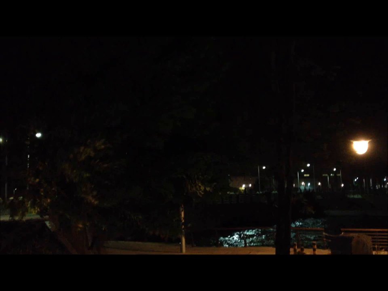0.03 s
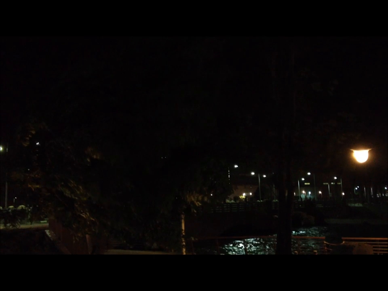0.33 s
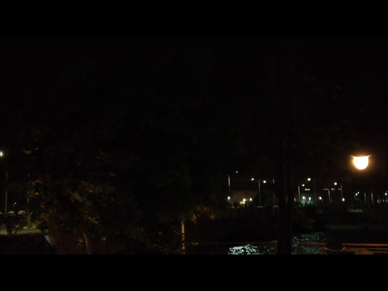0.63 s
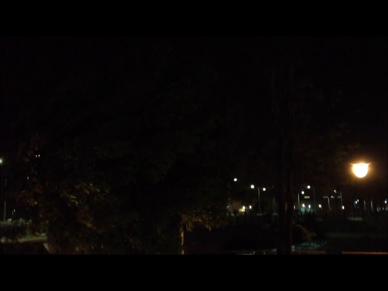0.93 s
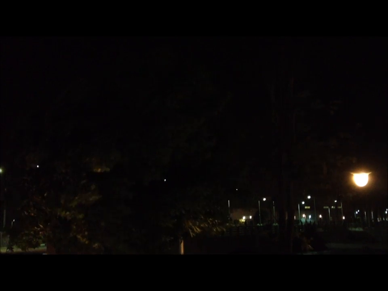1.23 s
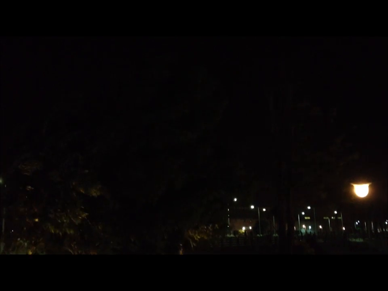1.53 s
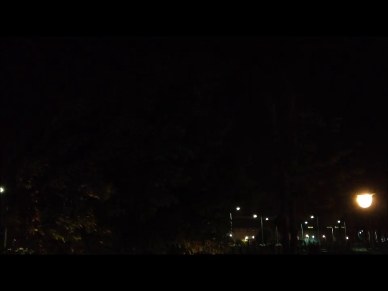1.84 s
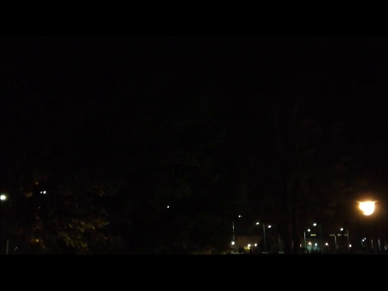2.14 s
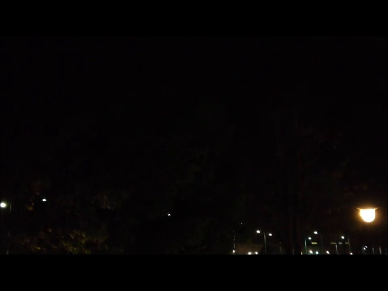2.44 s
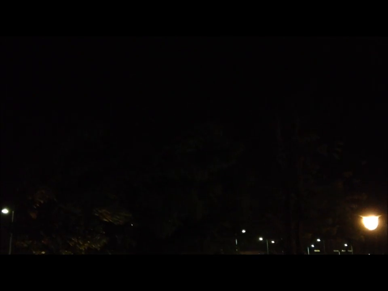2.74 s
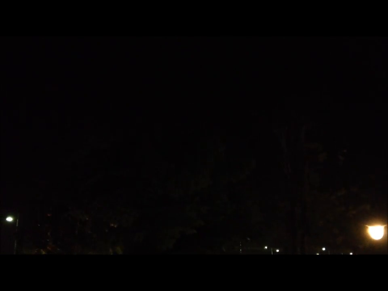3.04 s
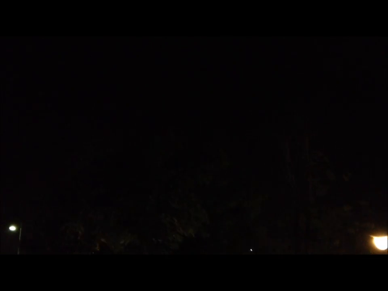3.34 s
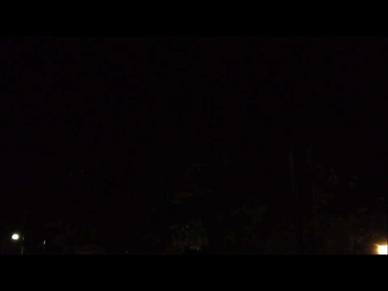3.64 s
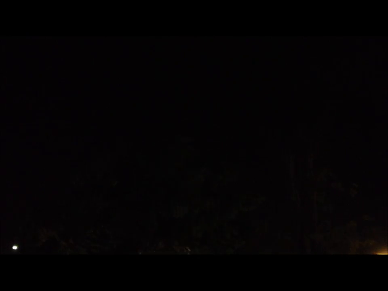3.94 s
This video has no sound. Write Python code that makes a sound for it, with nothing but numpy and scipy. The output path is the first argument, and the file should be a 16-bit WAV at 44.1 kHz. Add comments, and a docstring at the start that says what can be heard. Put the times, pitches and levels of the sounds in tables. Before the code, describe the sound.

Wind rushes through park trees at night, leaves hissing over a low rumble, with a faint twig tick now and then. It eases slightly, then a stronger gust builds as a few soft bumps touch the microphone.

```python
"""Wind in park trees at night, heard through one microphone.
First a gust rushes through the treetops over a low rumble; countless leaves hiss and patter.
Now and then a twig ticks or a soft puff of air hits the microphone. The gust dies away,
and in the lull a deeper rumble swells. From about 2.6 s a hand bumps the microphone a few times,
while a second, stronger gust builds. It peaks near 3.5 s and begins to ease."""
import sys
import numpy as np
from scipy import signal
from scipy.fft import rfft, irfft
from scipy.io import wavfile
from scipy.ndimage import uniform_filter1d

SR = 44100
rng = np.random.default_rng(int(sys.argv[2]) if len(sys.argv) > 2 else 0)


def dump(signal):
    """Clip the signal to [-1, 1] and save it as 16-bit WAV at the path in sys.argv[1]."""
    limited = np.clip(np.atleast_2d(signal).T, -1, 1)
    pcm = np.round(limited * 32767).astype(np.int16)
    wavfile.write(sys.argv[1], SR, pcm)


N = 176400
T = np.arange(N) / SR


# How loud the rushing air is over time: time_s, level_db
RUSH_LOUDNESS = [(0, -43), (.45, -44), (1.1, -44.5), (1.4, -45.3), (1.9, -46), (2.3, -45), (2.72, -45),
                 (2.9, -43), (3.45, -41), (4, -44)]
# Its tone, from low to high: pitch_hz, level_db
RUSH_TONE = [(150, -25), (330, -4), (410, 0.5), (500, -2.5), (620, -0.3), (730, 1), (900, 0), (1100, -3),
             (1500, -1.5), (2000, -2), (2500, -6.5), (3200, -11), (5000, -15.5), (10000, -51)]
def rushing_air():
    """Air streaming through the treetops makes a smooth, distant roar."""
    return from_db(curve(RUSH_LOUDNESS)) * with_tone(rng.standard_normal(N), RUSH_TONE)


# How strong the wind is, for the leaves and the wind's rumble: time_s, strength_db
WIND_STRENGTH = [(0, -1.5), (.25, -0.2), (.8, -0.5), (1.15, -1.2), (1.4, -3.5), (1.62, -2.2), (1.95, -3.5),
                 (2.52, -4.5), (2.8, -2.5), (3.05, 0.9), (3.45, 3), (3.7, 2.5), (4, 0.3)]
# The tone of leaves rubbing together: pitch_hz, level_db
LEAF_TONE = [(1000, -26), (2400, -7), (3300, -6.5), (3900, -2), (4500, 2), (5050, 3), (5700, -2.5),
             (6300, -1.5), (7400, 0.5), (8500, -2.5), (9300, -7), (10100, -13), (11000, -10.5),
             (12000, -9.5), (13800, -8), (15500, -12.5)]
def leaves():
    """Far leaves blur into a hiss; near ones patter as they touch, more often in a gust."""
    wind_db = curve(WIND_STRENGTH)
    hiss_db = -44.5 + wind_db + 0.82 * wander(rate_hz=6.3)
    hiss = from_db(hiss_db) * with_tone(rng.standard_normal(N), LEAF_TONE)
    touches_per_s = 900 * from_db(wind_db)
    touches = rng.random(N) < touches_per_s / SR
    size_db = 3.5 * np.minimum(rng.exponential(1, N), 4)   # many small touches, a few big ones
    clicks = touches * from_db(size_db) * rng.choice([-1, 1], N)
    patter = from_db(-53.5 + wind_db / 2) * with_tone(clicks, LEAF_TONE)
    return hiss + patter


# One row per twig tick; fade_s is the time it takes the snap to drop by 60 dB:
# start_s, level_db, pitch_hz, width_ratio, fade_s, knock_vs_snap_db
TWIG_TICKS = [(0.351, -31, 1550, 1.2, 0.015, -22), (.592, -41, 4400, 1.17, 0.15, -15),
              (1.219, -41, 5200, 1.15, .025, -20), (1.508, -39, 6200, 1.4, .025, -25),
              (1.5825, -38.5, 8350, 1.13, 0.037, 0), (2.143, -49, 11500, 1.25, .03, -17),
              (3.109, -47, 12000, 1.5, .03, -13), (3.7, -35.5, 5760, 1.4, 0.067, -5)]
def twig_ticks(rise_s=0.00074, knock_fade_s=0.063):
    """Each twig gives a bright snap over a knock, the wood's own short ring."""
    out = np.zeros(N)
    wood = band_noise(pitch_hz=3370, width_ratio=1.34)
    for start_s, level_db, pitch_hz, width_ratio, fade_s, knock_vs_snap_db in TWIG_TICKS:
        age_s = np.maximum(T - start_s, 0)
        rise = np.minimum(age_s / rise_s, 1)
        snap = from_db(-60 * age_s / fade_s) * band_noise(pitch_hz, width_ratio)
        knock = from_db(knock_vs_snap_db - 60 * age_s / knock_fade_s) * wood
        out += from_db(level_db) * rise * (snap + knock)
    return out


# One row per bump of the hand: peak_time_s, level_db, pitch_hz
HAND_BUMPS = [(2.604, -36.5, 175), (2.75, -33.5, 168), (2.762, -39.5, 172), (3.084, -36.5, 250),
              (3.357, -32.5, 250), (3.391, -34.5, 218), (3.553, -40, 191)]
def hand_bumps(fade_cycles=0.93):
    """Each nudge of the hand rocks the microphone back and forth a couple of times."""
    out = np.zeros(N)
    for peak_time_s, level_db, pitch_hz in HAND_BUMPS:
        cycles = (T - peak_time_s) * pitch_hz
        swell = np.exp(-(cycles / fade_cycles) ** 2)   # about a third is left after fade_cycles
        rocking = np.sin(2 * np.pi * cycles + rng.uniform(0, 2 * np.pi))
        out += from_db(level_db) * swell * rocking
    return out


# One row per puff of air: peak_time_s, half_length_s, level_db, pitch_hz
AIR_PUFFS = [(0.097, 0.066, -46.5, 238), (0.186, 0.04, -49, 111), (0.531, 0.053, -43.5, 225),
             (0.995, 0.028, -52, 120), (1.675, 0.042, -51.5, 147), (2.055, 0.06, -47, 247),
             (2.308, 0.033, -44, 242), (2.368, 0.069, -50, 160), (2.496, 0.026, -43.5, 193),
             (3.217, 0.034, -42.5, 247), (3.464, 0.069, -47.5, 290), (3.568, 0.033, -45, 268)]
def air_puffs():
    """Each swirl of air that meets the microphone makes one soft swell of low noise."""
    out = np.zeros(N)
    for peak_time_s, half_length_s, level_db, pitch_hz in AIR_PUFFS:
        air = band_noise(pitch_hz, width_ratio=1.315)
        power = np.abs(uniform_filter1d(air ** 2, size=1300))   # averaged over about 30 ms
        steady_air = air / np.sqrt(power + 1e-6)
        swell = np.exp(-2 * ((T - peak_time_s) / half_length_s) ** 2)
        out += from_db(level_db) * swell * steady_air
    return out


# The tone of the wind's low roar: pitch_hz, level_db
RUMBLE_TONE = [(60, -28), (110, -16), (160, -6), (205, 3.5), (238, 4.5), (270, -0.5), (330, 1), (450, -13),
               (800, -22), (2000, -56)]
def wind_rumble():
    """An uneven low rumble rises with the wind, just before the leaves do."""
    wind_db = curve(WIND_STRENGTH, early_s=0.14)
    level_db = -49.5 + 0.71 * wind_db - 1.2 * wander(rate_hz=7.9)
    return from_db(level_db) * with_tone(rng.standard_normal(N), RUMBLE_TONE)


# How loud the deep background is over time: time_s, level_db
DEEP_LOUDNESS = [(0, -62), (.55, -51.5), (.8, -59), (1.4, -53.5), (1.8, -56), (2.5, -51), (3, -49.5),
                 (3.2, -55.5), (4, -59)]
# Its tone, from low to high: pitch_hz, level_db
DEEP_TONE = [(20, -33), (32, -32), (50, -23), (75, -11.5), (105, -4.5), (160, -1.5), (210, -6.5), (330, -7),
             (700, -32)]
def deep_rumble():
    """A dull background comes and goes, loudest as the lull between the gusts ends."""
    return from_db(curve(DEEP_LOUDNESS)) * with_tone(rng.standard_normal(N), DEEP_TONE)


def from_db(db):
    """Turn decibels into a number to multiply a sound by."""
    return 10 ** (np.asarray(db) / 20)


def unit_level(x):
    """Scale a signal so that its average level (rms) is one."""
    return x / np.sqrt(np.mean(x ** 2) + 1e-20)


def curve(table, early_s=0):
    """Join a table's points with straight lines, giving a value for every sample."""
    return np.interp(T + early_s, *np.transpose(table))


def wander(rate_hz):
    """A slow random wobble with an average level of one."""
    step, warm_up = 40, 2000   # one point per 40 samples; the first points are dropped
    memory = np.exp(-2 * np.pi * rate_hz * step / SR)
    noise = rng.standard_normal(N // step + warm_up + 2)
    slow = signal.lfilter([1], [1, -2 * memory, memory ** 2], noise)[warm_up:]
    return np.interp(np.arange(N) / step, np.arange(len(slow)), unit_level(slow))


def with_tone(x, tone):
    """Shape a sound's lows and highs to follow a tone table, at an average level of one."""
    pitch_hz, level_db = np.transpose(tone)
    all_hz = np.maximum(np.arange(N // 2 + 1) * SR / N, 1)
    gain = from_db(np.interp(np.log(all_hz), np.log(pitch_hz), level_db))
    bass_cut = np.minimum(all_hz / pitch_hz[0], 1) ** 2
    return unit_level(irfft(rfft(x) * gain * bass_cut, N))


def band_noise(pitch_hz, width_ratio):
    """Noise around one pitch, at an average level of one; a bigger ratio makes it wider."""
    edges_hz = [pitch_hz / width_ratio, min(pitch_hz * width_ratio, .45 * SR)]
    band = signal.butter(2, edges_hz, "band", fs=SR, output="sos")
    return unit_level(signal.sosfilt(band, rng.standard_normal(N)))


def scene():
    """All the sounds meet at one microphone, which feeds both channels."""
    wind = rushing_air() + leaves() + wind_rumble() + deep_rumble()
    mix = wind + air_puffs() + hand_bumps() + twig_ticks()
    return np.array([mix, mix])


def record(dry, opens_s=0.037, cutoff_hz=15400):
    """The recorder opens after an instant of near silence and cuts off the highest treble."""
    gate = np.where(T > opens_s, 1, from_db(-61))
    treble_cut = signal.ellip(12, .1, 80, cutoff_hz, fs=SR, output="sos")
    return signal.sosfilt(treble_cut, dry * gate)


dry = scene()
out = record(dry)
dump(out)
```